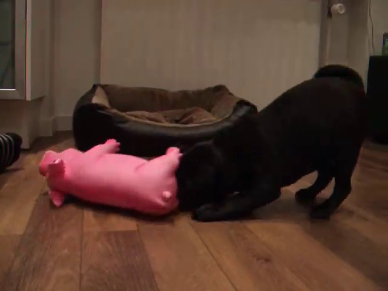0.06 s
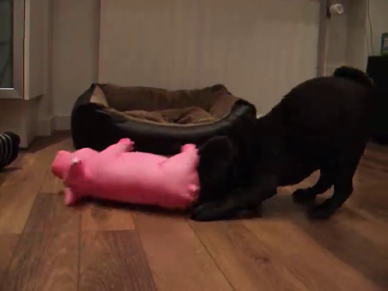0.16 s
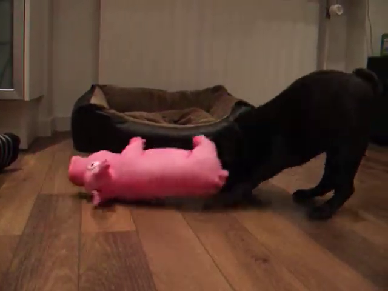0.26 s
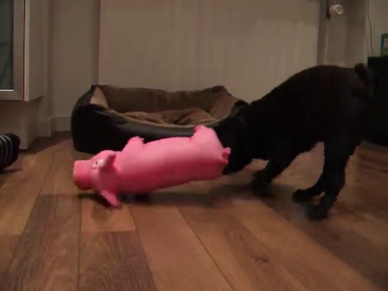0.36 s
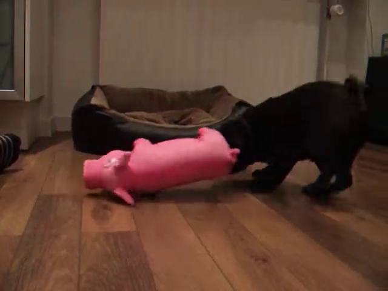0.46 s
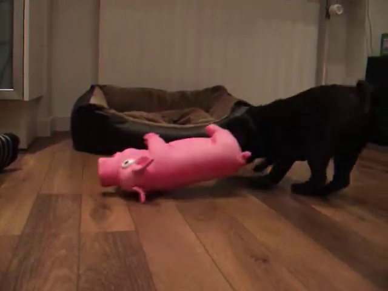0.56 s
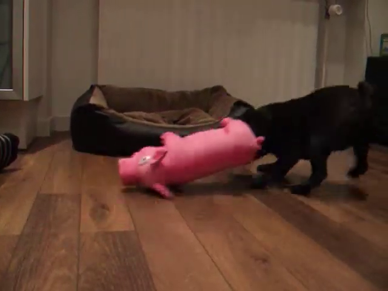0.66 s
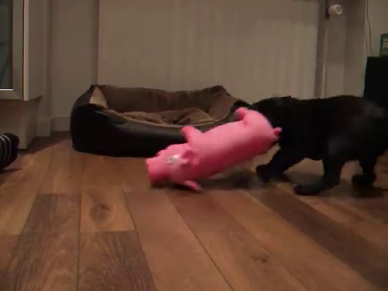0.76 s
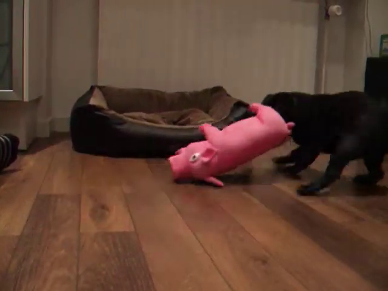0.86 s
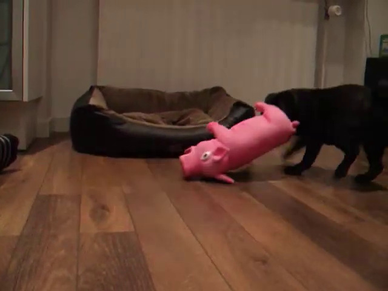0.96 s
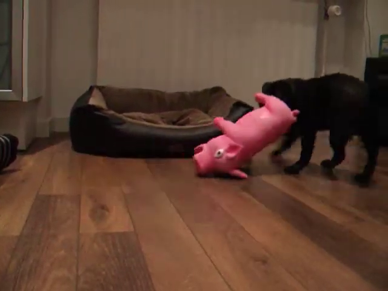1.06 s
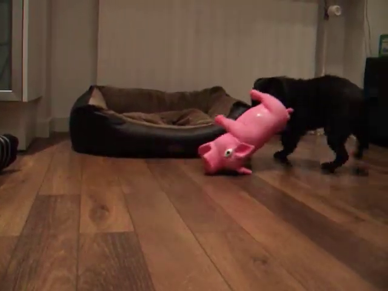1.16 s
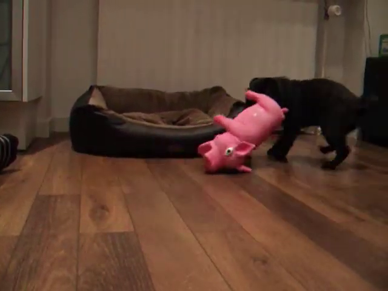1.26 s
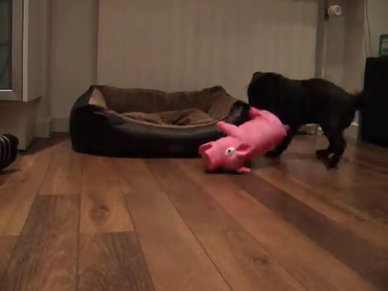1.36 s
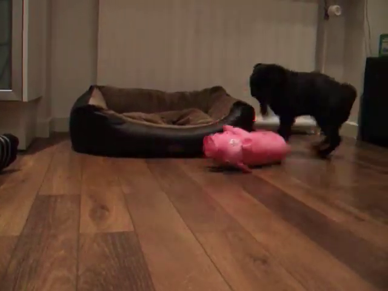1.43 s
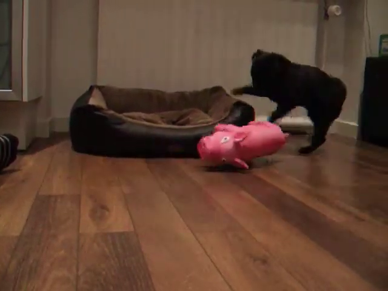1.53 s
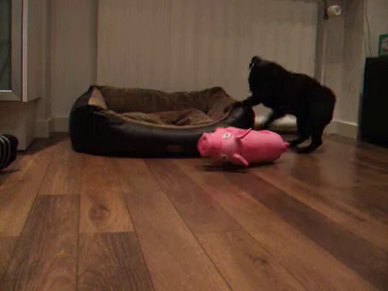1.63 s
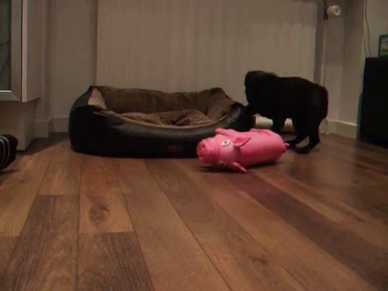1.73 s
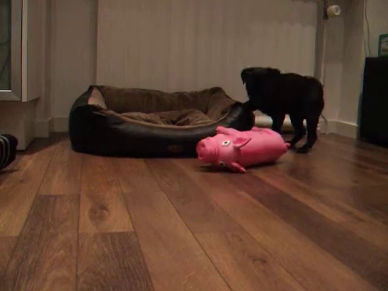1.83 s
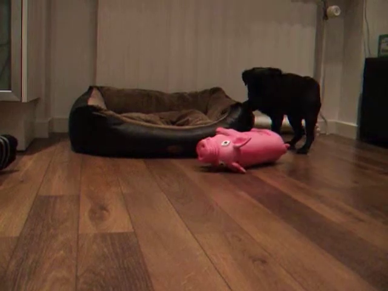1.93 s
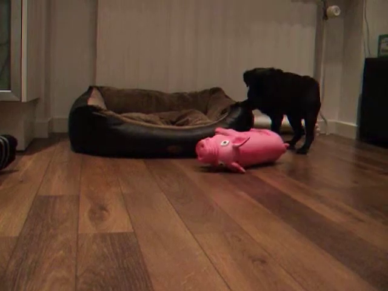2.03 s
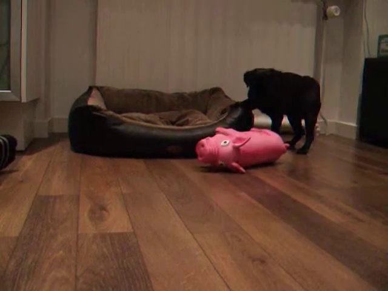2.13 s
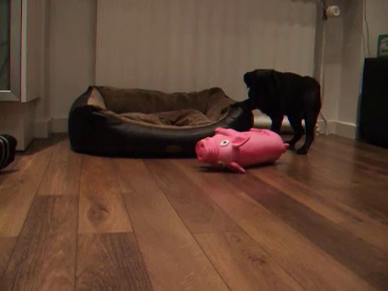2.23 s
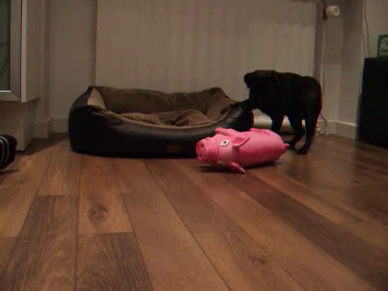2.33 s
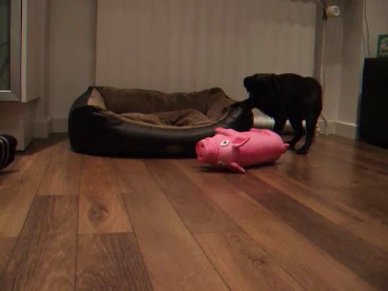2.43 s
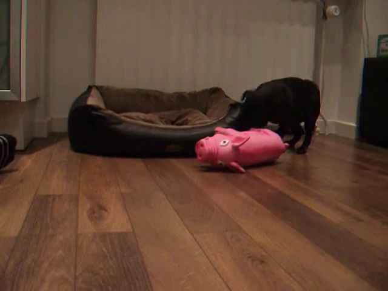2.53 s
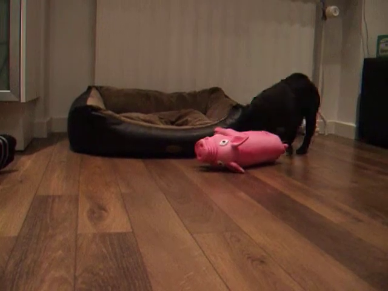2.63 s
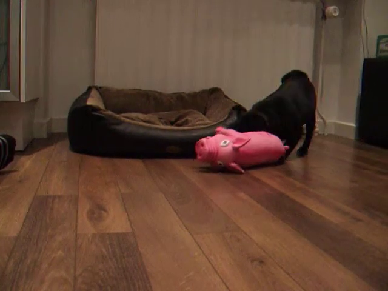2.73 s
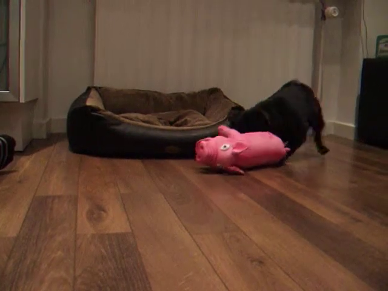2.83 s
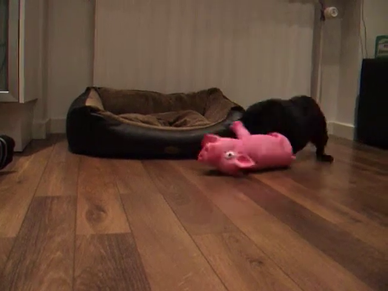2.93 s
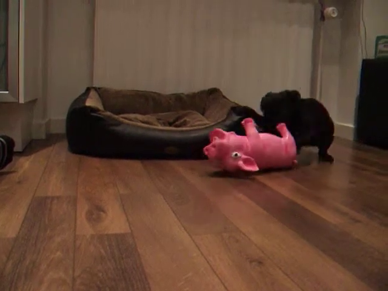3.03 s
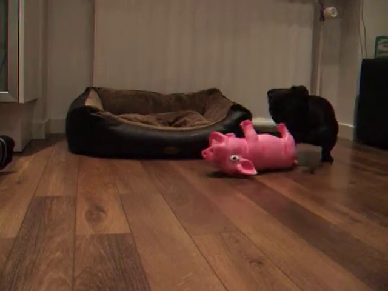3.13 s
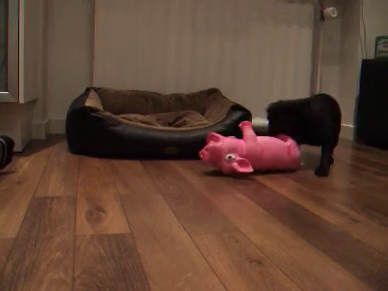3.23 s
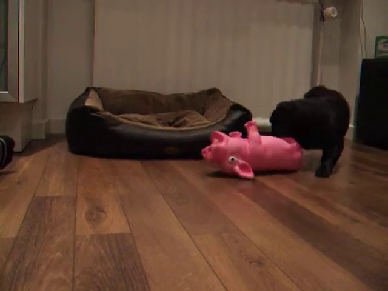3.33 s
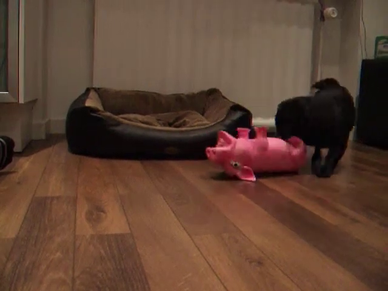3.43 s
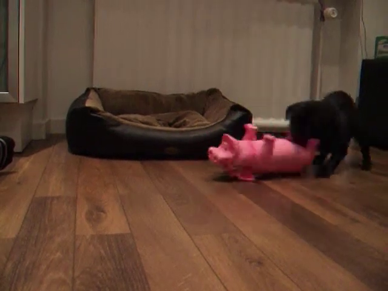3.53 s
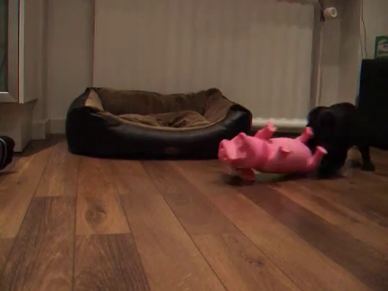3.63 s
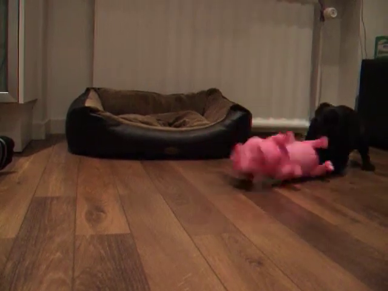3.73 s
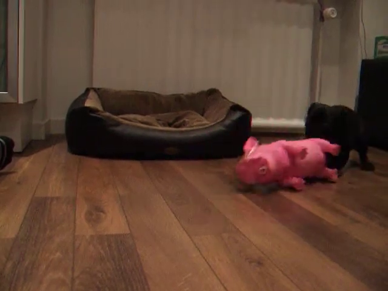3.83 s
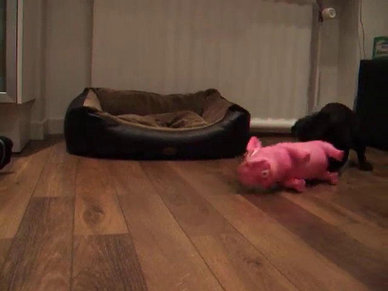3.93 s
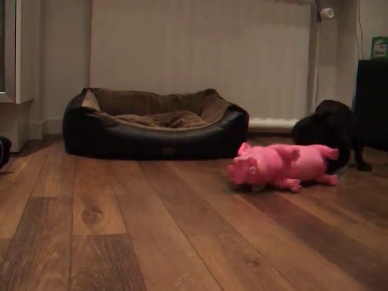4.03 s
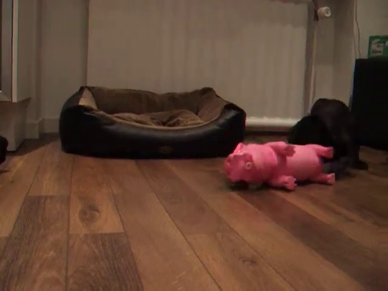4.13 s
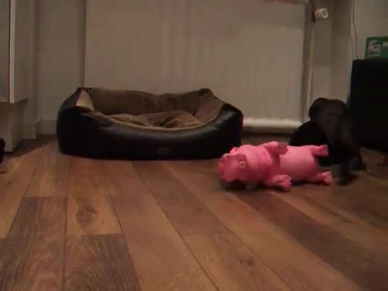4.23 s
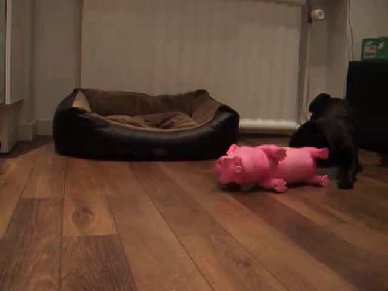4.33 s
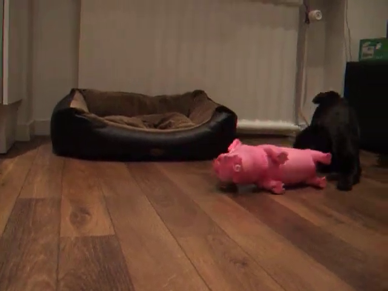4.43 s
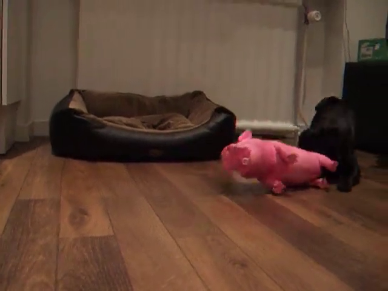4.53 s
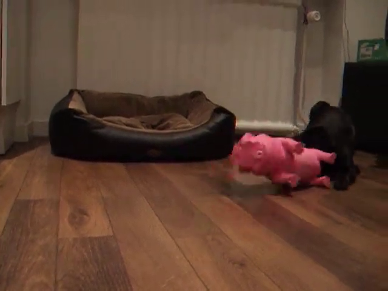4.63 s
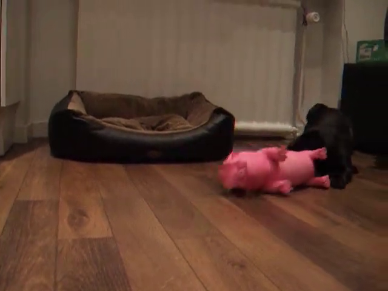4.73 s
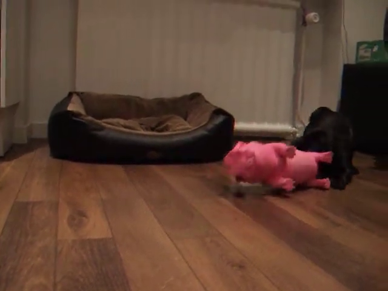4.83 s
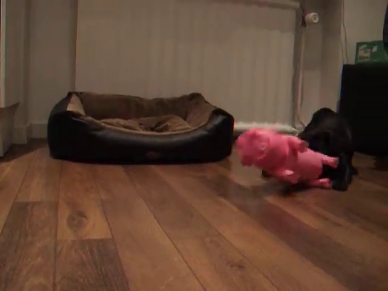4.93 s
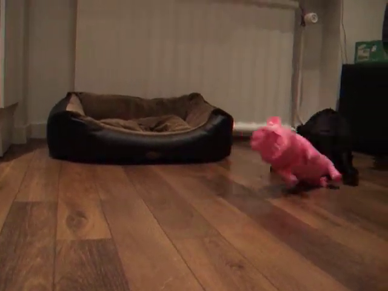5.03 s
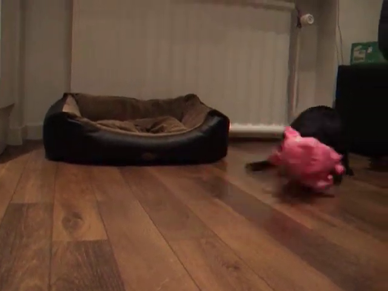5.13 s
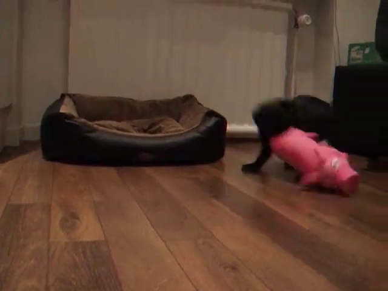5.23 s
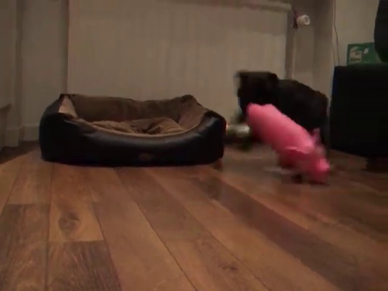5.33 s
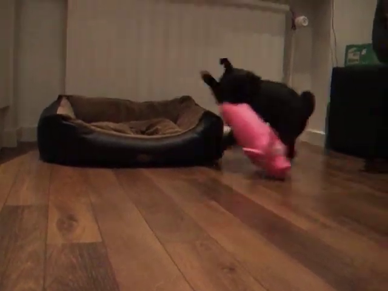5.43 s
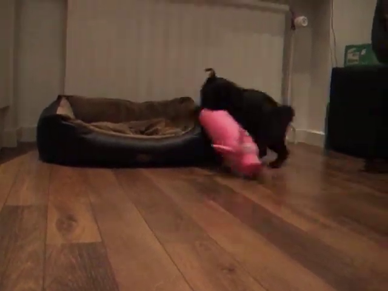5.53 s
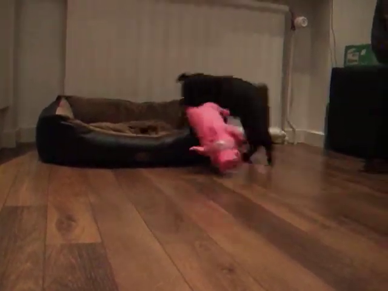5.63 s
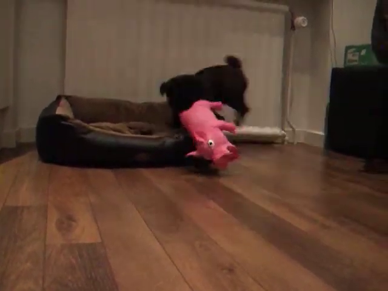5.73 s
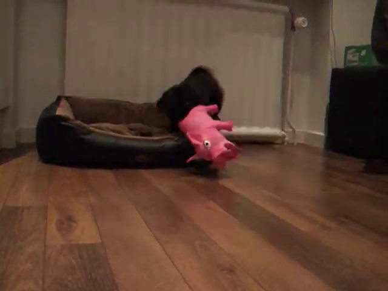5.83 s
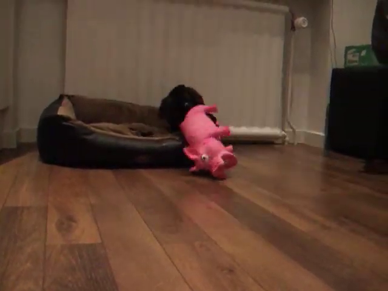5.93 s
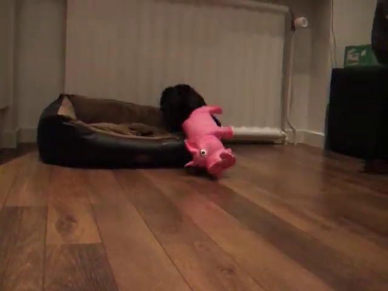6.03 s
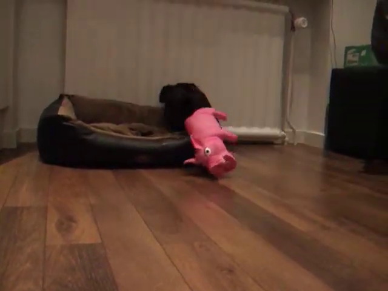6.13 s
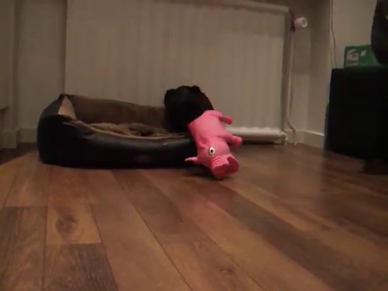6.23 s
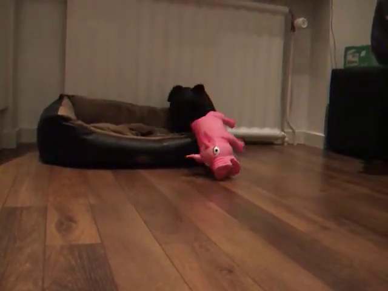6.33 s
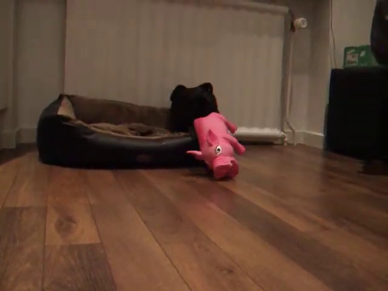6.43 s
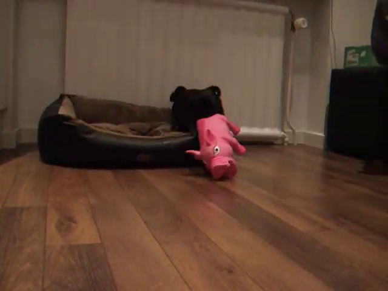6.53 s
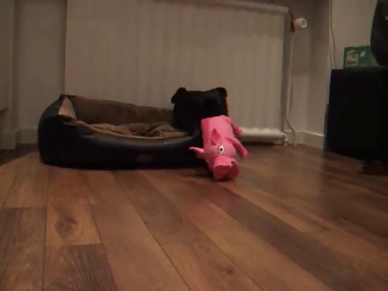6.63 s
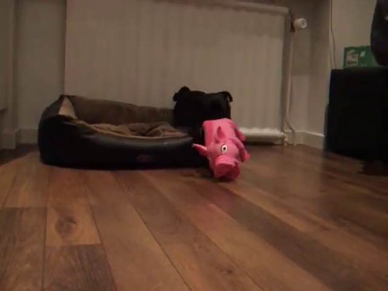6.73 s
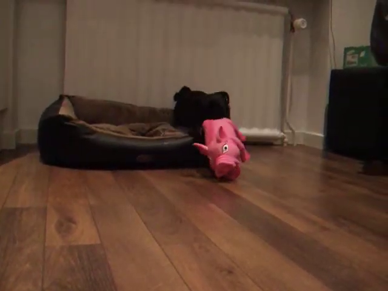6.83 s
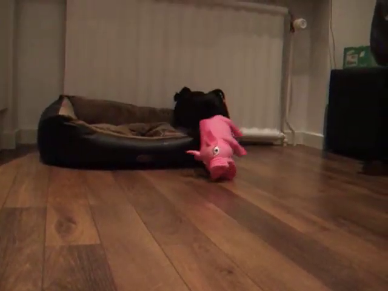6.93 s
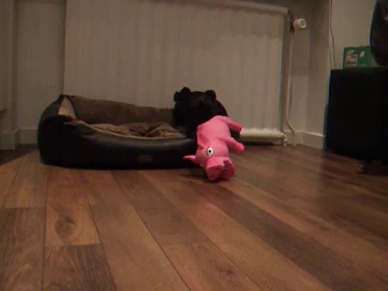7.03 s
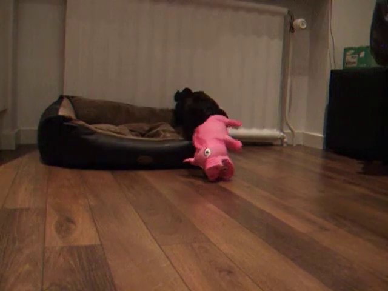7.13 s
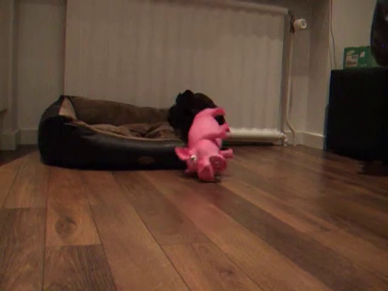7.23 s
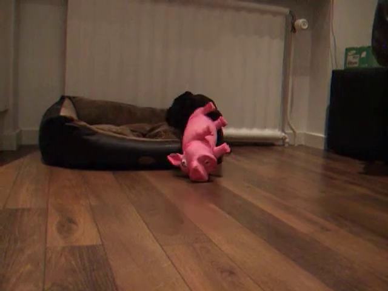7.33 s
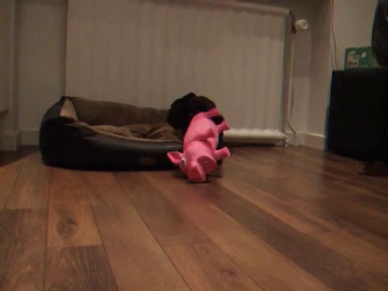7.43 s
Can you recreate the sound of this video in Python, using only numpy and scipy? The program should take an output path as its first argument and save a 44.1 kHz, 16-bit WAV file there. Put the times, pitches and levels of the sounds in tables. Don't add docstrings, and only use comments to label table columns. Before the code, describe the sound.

A small dog's claws click on a wooden floor as it snorts and shoves a hollow rubber toy that croaks out raspy, pig-like grunts.

```python
import sys
import numpy as np
from scipy import signal
from scipy.fft import rfft, irfft, next_fast_len
from scipy.io import wavfile
from scipy.ndimage import uniform_filter1d

SR = 44100
rng = np.random.default_rng(int(sys.argv[2]) if len(sys.argv) > 2 else 0)


def gain_from_decibels(decibels):
    exponent = np.asarray(decibels, float) / 20
    return 10 ** exponent


def store_wav(level_fs):
    pcm = np.round(np.clip(np.atleast_2d(level_fs), -1, 1) * 32767)
    wavfile.write(sys.argv[1], SR, pcm.T.astype(np.int16))


N = 329150

# first_flap_s, flaps, gap_ms
SQUEEZES = [(1.5115, 2, 12), (1.649, 5, 19.2), (1.823, 2, 19), (1.933, 2, 20), (2.024, 2, 22),
            (2.726, 4, 15.9), (2.7895, 4, 17.5), (3.307, 6, 18.3), (3.8745, 3, 21), (4.054, 8, 19.4),
            (4.282, 10, 19.85), (4.4815, 4, 21.7), (4.7815, 4, 16.7), (5.325, 2, 22), (5.616, 4, 21),
            (6.066, 5, 23.2), (6.305, 4, 18.8), (6.791, 5, 20), (7.071, 8, 20.5), (4.5815, 1, 20),
            (4.764, 1, 17), (4.852, 1, 18), (2.706, 1, 19), (2.864, 1, 19)]
# middle_db, last_minus_first_db, upper_modes_db (toy facing us or away),
# lowest_modes_db, end_flaps_db
GRUNTS = [(-21.5, 5, -5.5, 3, 0.5), (-25, -3, 2.5, 1.5, -7), (-29, 0.5, -4, 0, 0),
          (-31.5, -8, -10.5, 0.5, -3.5), (-41.5, -13.5, -10.5, -7.5, -3), (-23.5, 7.5, 5.5, 10, -0.5),
          (-22, -8.5, 4.5, 9.5, -2.5), (-24, 5, -1, -1.5, -6), (-32.5, -17, -2.5, 5, -1.5),
          (-21.5, 5, 2.5, 1, -1.5), (-22, 5, -0.5, -1, -5.5), (-31, -3, 1, -6.5, 1.5),
          (-19.5, 1.5, 2, 10, -3), (-26, -3, -23, -6, -2), (-28.5, -2, 2, -6, -1.5),
          (-40, -7.5, 0, -3.5, 4.5), (-20, 7.5, 5, -4.5, -3.5), (-24, 0.5, -2.5, -1, -4),
          (-25.5, 0, -1, -6, -9), (-37.5, 0, -4, 0, 0), (-31, 0, -9, 5, 0), (-27, 0, -7.5, 7, 0),
          (-32, 0, -9, 3, 0), (-32, 0, -4, 6, 0)]
REED_STIRS = [(0, 1), (1, -.3), (2, .45)]
# mode_hz, width_hz, level_db
PIPE = [(352, 55, -11), (485, 85, -11), (1180, 200, -11), (1340, 240, -9), (1920, 280, -7), (2130, 320, -6),
        (2700, 600, -12), (3820, 160, -6.5), (4640, 190, -4.5), (5480, 150, -15), (6360, 150, -13),
        (7170, 120, -16), (7300, 3300, -28.5)]

# start_s, swell_s, fade_s, top_effort_db, fade_db
BREATHS = [(.268, 0.006955, 0.20693, -22, -22.5), (1.407, 0.00906, 0.0838, -34, -9),
           (2.902, 0.02349, 0.12458, -23, -32.5), (3.683, 0.0418, 0.1353, -21.5, -31.5),
           (5.435, 0.01724, 0.07564, -31, -8.5), (6.575, 0.02529, 0.0983, -28, -11.5),
           (.985, 0.02855, 0.05216, -39.5, -33), (1.149, 0.00349, 0.0997, -34, -26),
           (2.651, 0.016334, 0.011, -30, -19.5), (3.575, 0.0864, 0.11824, -30.5, -19.5),
           (5.76, 0.03637, 0.0944, -42.5, -15.5), (6.385, 0.12994, .08, -30, -7.5)]
# mode_hz, width_hz, level_db
NOSES = [
    [(583.18, 233.46, -3.5), (875.3, 350.6, -2.5), (1551.5, 542.9, -1.5), (4337.2, 460.5, -8),
     (7854, 2053, -15.5)],
    [(640, 495.5, -5), (1894.6, 891.5, -10.5), (4300, 1000, -8.5), (6000, 490, -8), (8546.6, 756, -6)],
    [(700, 250, -12), (1130, 220, -4), (1700, 380, -1), (3400, 550, -11), (7400, 1400, -17)],
    [(640, 291.8, 1.5), (1950, 740.2, 3), (2550.5, 642.4, 2), (4300, 595.7, -1), (8050, 1347.5, 4)],
    [(652, 535.8, -5), (1762, 438.1, -3), (3374.6, 439.4, -2), (4603, 410, -3), (7000, 3200, -14)],
    [(800.2, 563.8, -2.5), (1986.7, 140, 0.5), (2381.6, 199.2, 3), (3799, 1722, -5), (6950, 1740, -3)],
]
# mode_hz, width_hz, level_db
WHISTLES = [
    [(3800, 810, -3.5), (6416, 3138, -7)],
    [(4088.2, 897.7, -4.5), (6313, 3836, -15.5)],
    [(4156.6, 1562.5, 14.5), (6598, 4020, 7)],
    [(5557, 1475, -8), (7504.6, 3540, 2)],
    [(1888, 100, 0.5), (3000, 1100, -11.5), (7222, 620, -7)],
    [(4338, 2020, -13), (6900, 3136, -6)],
]
# depth_ratio, unevenness_ratio, puff_s
FLUTTERS = [(.3, .23, .275), (.3, .2, 1.411), (.2, .2, 2.907), (.6, .03, 3.7045), (.3, .23, 5.437),
            (.05, .23, 6.576), (.3, .23, 1.0), (.2, .23, 1.15), (.3, .23, 2.65), (.8, .03, 3.7045),
            (.2, .23, 5.8), (.15, .23, 6.4)]
RISES = [.001] * 6 + [.02, .002, .02, .02, .02, .02]

# start_s, held_s, rubber_drag_db, weight_on_boards_db
SHOVES = [(.07, 0.06575, -45.5, -68), (.28, 0.027, -41, -54.5), (.38, 0.06754, -48.5, -49),
          (0.738, 0.03266, -40.5, -51.5), (0.868, 0.0136, -28, -48.5), (.9, 0.21532, -32, -58),
          (1.35, 0.085, -45.5, -53.5), (1.51, 0.02477, -39.5, -50.5), (1.645, 0.04685, -38.5, -49.5),
          (1.73, 0.02188, -45, -44), (1.819, 0.02129, -41, -68), (2.73, 0.0711, -41, -54),
          (2.81, 0.0292, -37, -57), (2.92, 0.06775, -42, -55.5), (3.226, 0.03196, -44, -48),
          (3.31, 0.06196, -46, -51), (3.68, 0.1195, -40.5, -47), (3.86, 0.09803, -47, -51.5),
          (4.08, 0.1171, -43.5, -64), (4.33, 0.1059, -46, -56.5), (4.539, 0.013064, -49, -47),
          (4.781, 0.0508, -40.5, -52.5), (5.22, 0.01978, -57.5, -53.5), (5.312, 0.02307, -33, -41),
          (5.44, 0.06446, -37, -53.5), (5.58, 0.04351, -45, -43.5), (5.96, 0.0715, -39.5, -44.5),
          (6.319, 0.0429, -44, -65), (6.58, 0.10325, -45.5, -54.5), (7.09, 0.05747, -47, -62),
          (7.37, 0.0121, -47.5, -62)]
# time_s, share_of_separate_slips_ratio
GRIP = [
    (0.857, 1.0),
    (.93, 0.25),
    (1.0, 0.33),
    (1.06, 0.93),
    (1.09, 0.03),
    (1.189, 0.23),
]
# mode_hz, width_hz, level_db
GROAN = [(280, 32.33, -4), (215, 52.2, -7), (344.18, 38.14, -5), (428.66, 25.45, -4), (567.2, 80.76, -14),
         (743.3, 270.7, -22)]
# mode_hz, width_hz, level_db
BODY = [(187.61, 49.99, -1), (302.95, 206.08, -1), (417.84, 200.56, -5.5), (607.14, 149.38, -1.5)]
# mode_hz, width_hz, level_db
BOARDS = [(71.96, 26, 3.9), (118.08, 35, 3.5), (167.65, 22, 7.203)]
# start_s, top_db, settle_20db_s
SCUFFS = [(0.091, -43, 2), (.2, -40, 0.5485), (.28, -32.5, 0.2897), (0.39, -25, 0.0574), (.83, -48, .5),
          (1.2, -48, 0.0009), (1.4, -41, 0.3941), (1.47, -32.5, 0.1848), (1.74, -54.5, -4),
          (1.97, -58.5, -2.4848), (2.76, -30.5, .5), (2.97, -31.5, 0.191), (3.281, -38.5, 0.3173),
          (3.72, -45.5, 0.8184), (4.14, -42.5, 0.29), (4.42, -52, 1.5), (4.7, -47, 1), (4.801, -36, 0.2528),
          (5.23, -39.5, 1), (5.318, -29.5, 0.0908), (5.5, -32.5, 0.0019), (5.7, -47.5, -0.4565),
          (5.9, -44.5, 0.9913), (5.971, -34, 0.1438), (6.341, -39, 0.1833), (6.63, -30.5, 0.0125),
          (6.839, -41, 0.0911), (7.1, -53, 7.5), (7.28, -48.5, 0.3944)]
# freq_hz, density_db (per Hz)
SCUFF_COLOUR = [(1500, -32.5), (2600, -8), (3800, 3.5), (5000, 1), (6500, -1), (7800, -0.5), (9500, -6)]
# start_s, top_db, settle_20db_s
RUSTLES = [(.01, -48, 0.2985), (.21, -43, 0.8312), (.29, -30.5, 0.2438), (.62, -50, 0.5364),
           (1.36, -46.5, .5), (1.52, -29.5, -0.0276), (1.647, -36.5, 0.2965), (1.83, -44.5, 0.0949),
           (2.761, -29.5, 0.2749), (2.83, -39, 0.4893), (2.968, -23.5, 0.1137), (3.238, -39.5, 0.5685),
           (3.36, -46.5, 0.182), (3.74, -37.5, 0.3419), (4.15, -58.5, -1.5), (4.34, -39.5, 0.3111),
           (4.55, -52.5, 0.388), (4.73, -48, 0.778), (5.216, -39, .5), (5.319, -31, 0.153),
           (5.5, -36.5, 0.5), (5.74, -42.5, 0.1042), (5.9, -40, 0.6013), (6.34, -40, 0.5308),
           (6.5, -41, 1.0778), (7.1, -42, 0.6309), (7.359, -66.5, 3)]
# freq_hz, density_db (per Hz)
RUSTLE_COLOUR = [(350, -18.5), (650, -6.5), (1400, -8), (2300, -7.5), (3200, -17.5)]

# time_s, peak_db, ring_hz
CLAWS = [(0.268, -17, 7300), (0.2745, -14, 1405), (0.379, -12.5, 6800), (0.425, -18, 4550),
         (0.784, -28, 3600), (1.015, -19, 4570), (1.0417, -24.5, 4254), (1.151, -17, 3856),
         (1.1711, -14, 4550), (1.2325, -27, 4620), (1.344, -30.5, 6605), (1.368, -25, 3760),
         (1.395, -24.5, 1950), (1.4115, -11.5, 4410), (1.4302, -11.5, 4460), (1.448, -25, 6000),
         (1.4609, -28, 6580), (1.5009, -15.5, 7000), (1.699, -27, 3800), (1.761, -36, 3940),
         (1.819, -41.5, 3800), (3.288, -31.5, 5500), (3.685, -15, 2394), (2.766, -22.5, 4300),
         (.383, -20.5, 6500), (3.725, -17, 2400), (5.993, -20, 7200), (1.636, -34.5, 3520),
         (1.753, -26.5, 3547), (2.5696, -34.5, 3848), (2.597, -33.5, 4540), (2.672, -20, 6950),
         (3.226, -21.5, 3540), (3.3245, -19.5, 4989), (3.8518, -24.5, 7300), (6.521, -25, 6530),
         (4.69, -33.5, 5170), (5.204, -18.5, 7570), (5.395, -21.5, 4626), (5.439, -19, 3140),
         (5.5405, -7.5, 5440), (5.5683, -16, 3620), (5.889, -23.5, 994.5), (5.9819, -13.5, 3680),
         (5.978, -29.5, 3000), (6.51, -17, 6650), (3.2265, -25, 1700), (5.461, -25.5, 3200),
         (5.299, -23.5, 4600), (0.297, -24, 4300), (.318, -19, 4600), (.61, -34, 4300),
         (2.637, -30.5, 4300), (2.809, -24, 7300), (1.475, -23.5, 7800), (3.797, -28, 5000),
         (5.255, -28, 4700), (4.99, -30, 4600)]
# time_s, peak_db, ring_hz, t60_s
THUMPS = [(0.738, -30, 215, 0.2856), (0.861, -19, 332.7, 0.08475), (1.343, -30, 362.3, 0.0689),
          (1.645, -32, 293.6, 0.0556), (3.224, -21.5, 340.5, 0.0493), (5.3023, -13.5, 280, 0.08265),
          (5.475, -17.5, 605.6, 0.04212), (5.582, -22, 188.5, 0.05945), (5.953, -22.5, 173.7, 0.0853),
          (5.984, -29, 227.8, 0.1113), (7.376, -35.5, 300.7, 0.0829), (.742, -33.5, 414.4, 0.1791),
          (.866, -30.5, 745.7, 0.0602), (1.013, -31.5, 640, 0.0744), (.2, -38, 557.3, 0.455),
          (4.034, -34.5, 390.8, 0.1471), (4.415, -34.5, 75.22, 0.19), (5.22, -39.5, 70.08, 0.3135)]

# freq_hz, t60_s
ROOM = [(200, 0.21), (1000, 0.28484), (3000, 0.41675), (8000, 0.10867)]
# start_s, held_s, level_db
HANDLING = [
    (6.8, .7, -60.5),
]
# tone_hz, level_db
WHINE = [(7692.35, -58.5), (8307.65, -66.5)]
# freq_hz, density_db (per Hz)
HISS = [(12, -18.5), (25, -4.5), (45, -16.5), (300, -27), (1000, -18.5), (3000, -24.5), (7700, -25.5),
        (8500, -27.5)]
# freq_hz, gain_db
EDGE = [(7300, -0.5), (8000, -4.5), (8500, -14), (8900, -26.5), (9200, -51.5), (9600, -82)]


def reed_slap():
    t = np.arange(300) / SR
    slap = .075 * rng.standard_normal(len(t)) * np.exp(-((t - .003) / .0018) ** 2)
    for trips, size in REED_STIRS:
        centre_s = .0028 - trips * rng.uniform(.00112, .00126)
        slap += size * np.exp(-((t - centre_s) / .00005) ** 2)
    return slap


def toy():
    first_db = 0.5
    bend = .006
    drive = np.zeros((len(PIPE), N))
    for (s, count, gap_ms), (middle_db, tilt_db, upper_db, deep_db, ends_db) in zip(SQUEEZES, GRUNTS):
        k = np.arange(count)
        u = (2 * k - k[-1]) / max(k[-1], 1)
        db = middle_db + u * tilt_db / 2 + u ** 2 * ends_db + first_db * (k == 0)
        times = s + k * gap_ms / 1000 + .0003 * rng.standard_normal(count)
        for at, level_db in zip(times, db):
            slap = reed_slap()
            bright_db = upper_db + .6 * (level_db - db.max())
            colour_db = np.r_[[deep_db] * 2, [0] * 5, [bright_db] * 6]
            colour_db = colour_db + rng.standard_normal(len(PIPE))
            for mode, mode_db in zip(drive, colour_db):
                add(mode, at, gain_from_decibels(level_db + mode_db) * slap)
    shape = 1 + bend * wander(N, 1200)
    return gain_from_decibels(24.5) * sum(cavity(mode, PIPE[k:k + 1], shape) for k, mode in enumerate(drive))


def snort(row, nose, flutter, rise_s):
    flutter_hz, swell_db_per_s = 79.5, 193
    start, swell, fade, top_db, fade_db = row
    depth, uneven, puff_s = flutter
    t = np.arange(0, swell + fade, 1 / SR)
    effort_db = top_db - swell_db_per_s * np.maximum(swell - t, 0)
    effort_db += fade_db * np.maximum(t - swell, 0) / fade
    uneven_wander = evened(uniform_filter1d(rng.standard_normal(len(t)), 400))
    turns = np.cumsum(flutter_hz * (1 + uneven * uneven_wander)) / SR
    turns -= np.interp(puff_s - start, t, turns)
    puffs = 3 * np.exp(-(turns % 1) / .2)
    depth = depth * gain_from_decibels(effort_db - top_db) ** .5
    air = (1 - depth + depth * puffs) * lumpy(len(t), 40, 2.5)
    pop_db = 3 * np.exp(-t / 0.025)
    narrowing = 0.9696 - 0.017 * (t / t[-1]) ** 2
    sound = evened(cavity(air, nose, narrowing))
    edges = np.minimum(t / rise_s, 1) * signal.windows.tukey(len(t), .02)
    return start, gain_from_decibels(effort_db + pop_db) * sound * edges


def movement():
    scuff = gusts() * coloured(lumpy(N, 90, 2.9), SCUFF_COLOUR)
    rustle = gusts() * coloured(lumpy(N, 150, 1.1), RUSTLE_COLOUR)
    boards = evened(cavity(lumpy(N, 500, 3.3), BOARDS))
    s, db, settle = np.transpose(SCUFFS)
    out = strokes(s, db, 0, settle, (246.15, -60)) * scuff
    s, db, settle = np.transpose(RUSTLES)
    out += strokes(s, db, 0, settle, (291.3, -62.5)) * rustle
    s, held, drag_db, weight_db = np.transpose(SHOVES)
    out += strokes(s, drag_db, held, 0.08102, (754.5, -58)) * drag()
    return out + strokes(s, weight_db, held, 0.16, (860, -67.5)) * boards


def drag():
    slips_hz = 63.5
    t = np.arange(N) / SR
    s, share = np.transpose(GRIP)
    slip_phase = np.cumsum(slips_hz * (1 + 0.25 * wander(N, 700))) / SR
    slips = np.diff(np.floor(slip_phase), prepend=0) * gain_from_decibels(4.512 * rng.standard_normal(N))
    jerks = evened(cavity(evened(slips) + 1.07 * rng.standard_normal(N), GROAN))
    sung_hz = GROAN[0][0] * (1 + 0.011313 * wander(N, 700))
    singing = np.sqrt(2) * np.sin(2 * np.pi * np.cumsum(sung_hz) / SR)
    share = np.clip(np.interp(t, s, share), 0, 1)
    groan = np.sqrt(share) * jerks + np.sqrt(1 - share) * singing
    judder = evened(cavity(lumpy(N, 200, 2.589), BODY))
    return np.where((t > s[0]) & (t < s[-1]), groan, judder)


def gusts():
    gain = np.ones(N)
    for s, count, gap_ms in SQUEEZES:
        flaps = np.arange(round(count * gap_ms * SR / 1000)) / SR * 1000 / gap_ms
        gain[round(s * SR):][:len(flaps)] = .55 + 1.5 * np.exp(-(flaps % 1) / .22)
    return uniform_filter1d(gain, size=60)


def knocks():
    out, t = np.zeros(N), np.arange(6000) / SR
    for s, db, hz in CLAWS:
        strike = np.minimum(t / .0004, 1) * np.exp(-t / .0014)
        scrape = 0.13 * np.exp(-t / 0.029)
        burst = rng.standard_normal(len(t)) * (strike + scrape)
        tick = cavity(burst, [(hz, 900, 0), (4200, 900, -6), (6300, 2000, -5), (1800, 1500, -24)])
        add(out, s, gain_from_decibels(db) * tick / abs(tick).max())
    for s, db, hz, t60 in THUMPS:
        ring = np.sin(2 * np.pi * hz * t) + .3 * np.sin(2 * np.pi * 2.3 * hz * t)
        add(out, s, gain_from_decibels(db - 3 - 60 * t / t60) * ring * np.minimum(t / .004, 1))
    return out


def room(x):
    taps = np.zeros(SR // 2)
    at = np.arange(200, len(taps) - 20, 20)
    taps[at + rng.integers(0, 20, len(at))] = rng.choice([-1., 1.], len(at))
    hz, t, z = signal.stft(taps, SR, nperseg=256)
    decay = gain_from_decibels(-60 * t / read(ROOM, hz)[:, None])
    tail = signal.istft(z * decay, SR, nperseg=256)[1]
    return signal.fftconvolve(x, tail / np.linalg.norm(tail))[:N]


def handling():
    s, held, db = np.transpose(HANDLING)
    rumble = evened(cavity(rng.standard_normal(N), [(28, 22, 0)]))
    return strokes(s, db, held, .2, (60, -90)) * rumble


def whine():
    switch_hz = 14.65
    t = np.arange(N) / SR
    flips = np.tanh(12 * np.sin(2 * np.pi * switch_hz * t))
    return flips * sum(np.sqrt(2) * gain_from_decibels(db) * np.sin(2 * np.pi * hz * t) for hz, db in WHINE)


def hiss():
    return gain_from_decibels(-54) * coloured(rng.standard_normal(N), HISS)


def strokes(s, db, held, settle, rule):
    t = np.arange(0, N + 128, 128)[:, None] / SR
    build, rest_db = rule
    rise_db = build * np.maximum(s - t, 0)
    fall_db = 20 * np.maximum(t - s - held, 0) / np.abs(settle)
    power = (gain_from_decibels(db - rise_db - fall_db) ** 2).sum(axis=1) + gain_from_decibels(rest_db) ** 2
    return np.interp(np.arange(N) / SR, t[:, 0], np.sqrt(power))


def resonate(x, hz, width, turn=None):
    r = np.exp(-np.pi * abs(width) / SR)
    if turn is None:
        return 2 * signal.lfilter([1 - r], [1, -r * np.exp(2j * np.pi * hz / SR)], x).real
    return 2 * (turn * signal.lfilter([1 - r], [1, -r], x * turn.conj())).real


def cavity(x, modes, factor=None):
    out = 0
    for k, (hz, width, db) in enumerate(modes):
        turn = None if factor is None else np.exp(2j * np.pi * hz * np.cumsum(factor) / SR)
        once = resonate(x, hz, width, turn)
        out = out + (-1) ** k * gain_from_decibels(db) * resonate(once, hz, 2 * width, turn)
    return out


def wander(count, span):
    return evened(uniform_filter1d(uniform_filter1d(rng.standard_normal(count), span), span))


def lumpy(count, span, spread_db):
    return gain_from_decibels(spread_db * wander(count, span)) * rng.standard_normal(count)


def shaped(x, spectrum):
    n = next_fast_len(N if x.ndim > 1 else len(x))
    return irfft(rfft(x, n) * gain_from_decibels(read(spectrum, np.fft.rfftfreq(n, 1 / SR))), n)[..., :x.shape[-1]]


def coloured(x, spectrum):
    return evened(shaped(x, spectrum))


def evened(x):
    return x / np.sqrt(np.mean(x ** 2) + 1e-20)


def read(points, hz):
    f, value = np.transpose(points)
    return np.interp(np.log(hz + 1), np.log(f + 1), value)


def add(mix, s, sound):
    part = mix[round(s * SR):][:len(sound)]
    part += sound[:len(part)]


def scene():
    grunts, hits, nose = toy(), knocks(), np.zeros(N)
    for parts in zip(BREATHS, NOSES + WHISTLES, FLUTTERS, RISES):
        add(nose, *snort(*parts))
    wet = room(gain_from_decibels(-8.0) * grunts + gain_from_decibels(-14.5) * hits + gain_from_decibels(-3.5) * nose)
    return (grunts + hits + nose + wet + movement())[None]


def low_pass(x):
    return signal.sosfilt(signal.butter(12, 9490, fs=SR, output="sos"), x)


def record(dry):
    limited = shaped(dry + handling() + hiss(), EDGE)
    offset = -.0024
    return low_pass(limited + whine() + offset)


dry = scene()
out = record(dry)
store_wav(out)
```